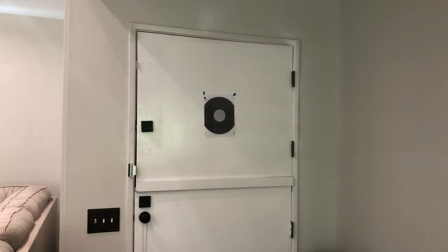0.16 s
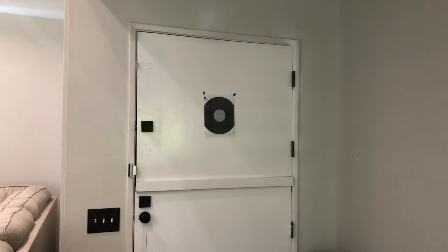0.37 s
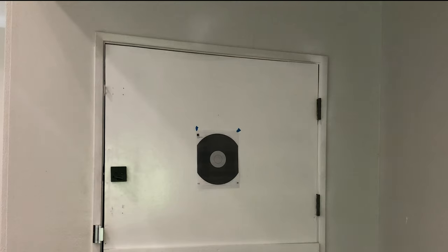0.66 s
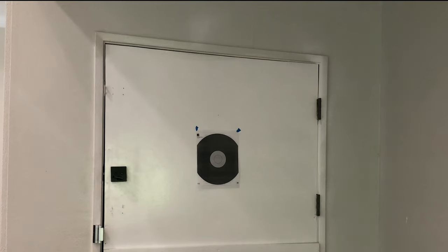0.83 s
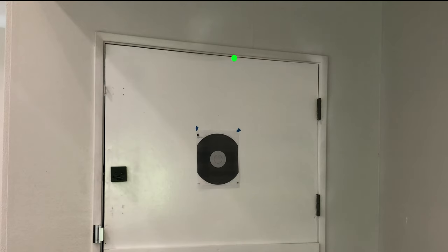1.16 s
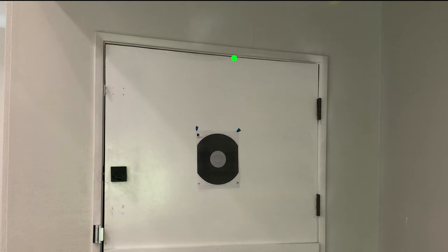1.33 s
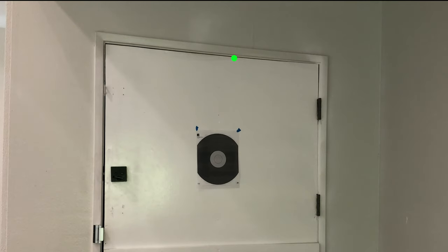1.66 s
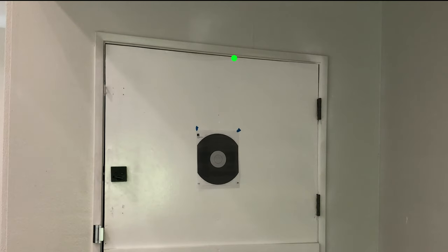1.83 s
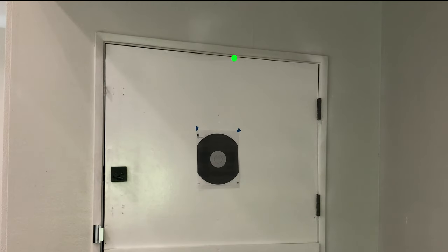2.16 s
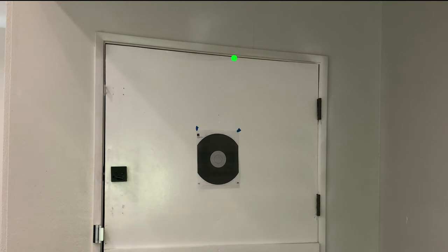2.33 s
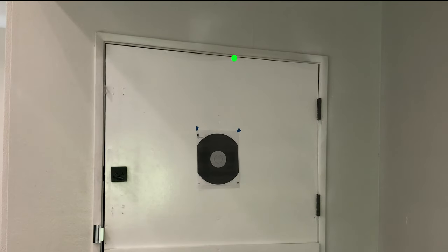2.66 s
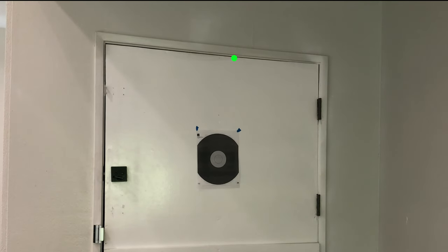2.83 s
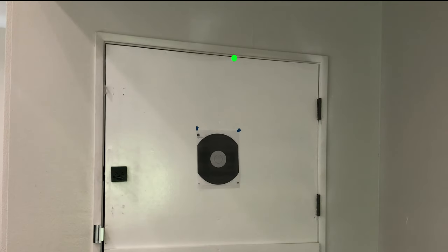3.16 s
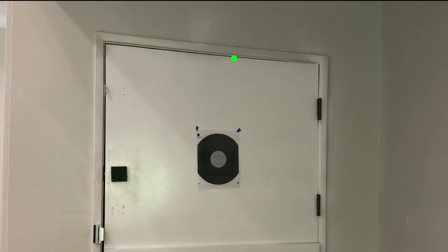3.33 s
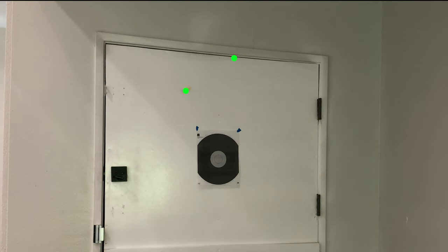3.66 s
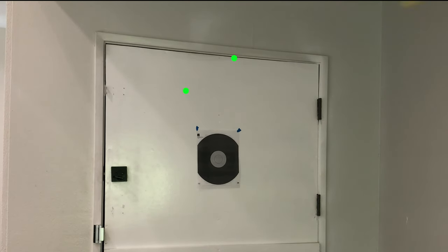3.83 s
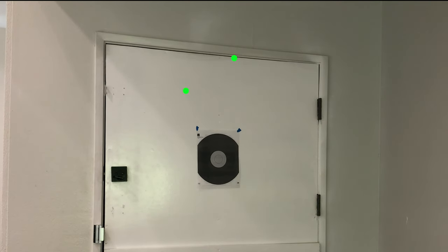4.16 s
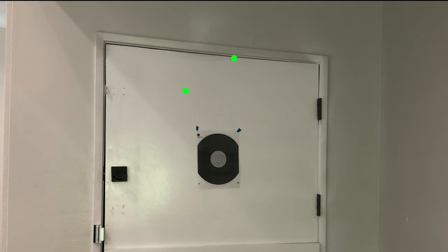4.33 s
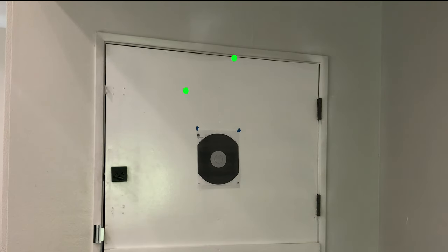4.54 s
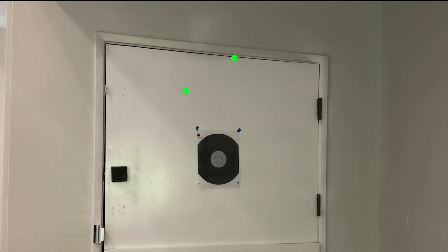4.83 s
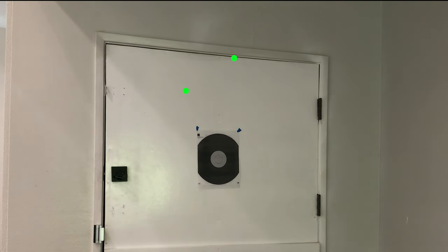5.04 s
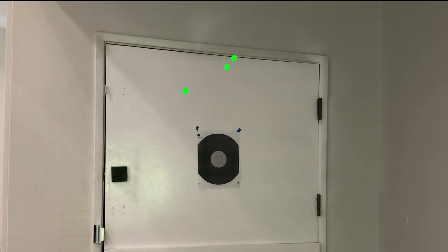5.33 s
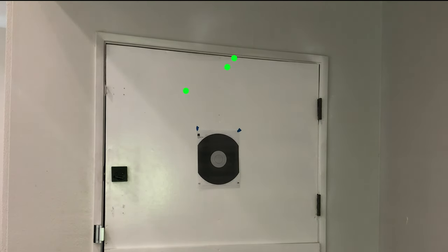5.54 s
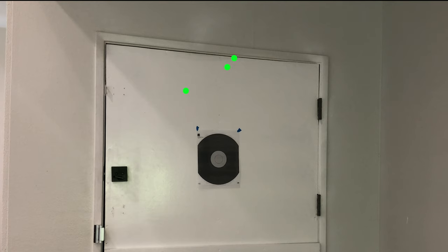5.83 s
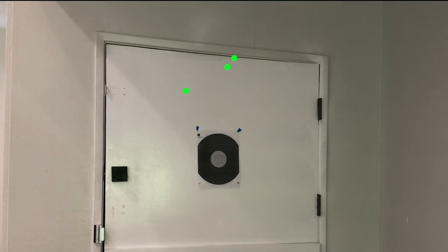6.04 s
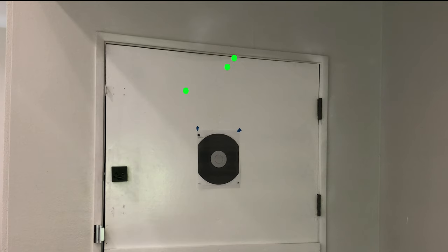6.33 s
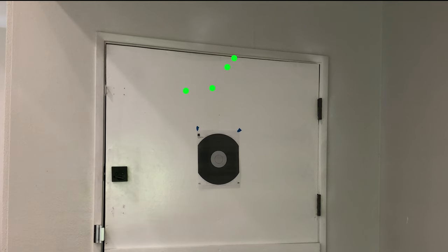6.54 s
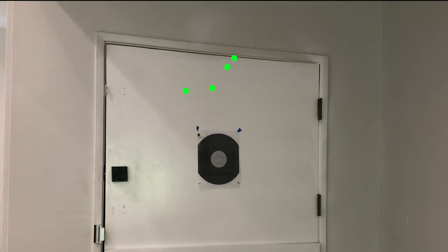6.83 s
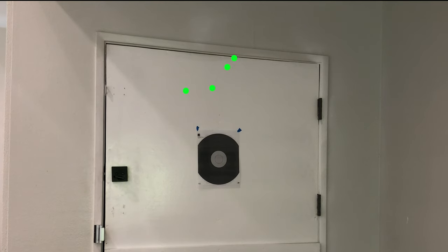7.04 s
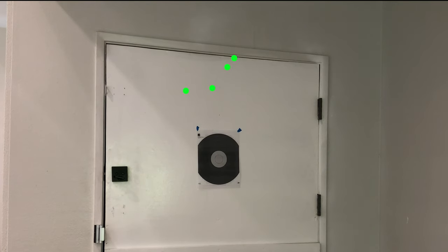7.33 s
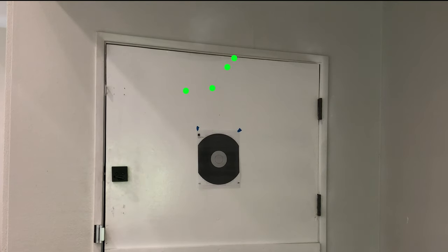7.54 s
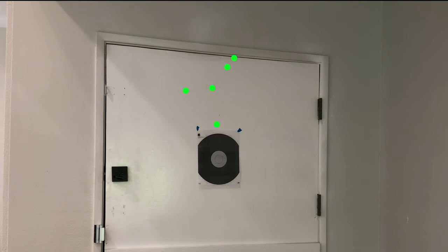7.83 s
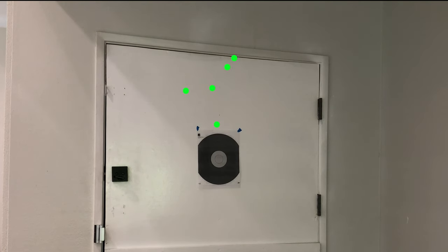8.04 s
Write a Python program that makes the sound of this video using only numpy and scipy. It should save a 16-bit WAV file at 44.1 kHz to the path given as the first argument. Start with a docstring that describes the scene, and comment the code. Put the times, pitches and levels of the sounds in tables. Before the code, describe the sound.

A toy blaster pops, and about 0.3 seconds later its foam ball smacks a panel door close to the microphone. The plastic pump then rattles back and clacks forward, ready for the next shot. Five shots come, the first pump slow, the later ones brisk at roughly 1.3-second spacing. Soft floor bounces follow some hits, and one ball thuds back right beside the microphone. The hard, bare room echoes over a quiet low hum.

```python
"""A pump-action foam ball blaster fires five times across a bare, echoing room at a door close to the microphone.
Each shot is a cavity tone from the barrel, bending upward, with the piston's slam as a burst of dense contacts.
The ball cracks on the door, an impulse dispersed by bending waves over ringing panel modes, and drops to the floor;
one rebounds with hollow thuds. The plastic slide rattles back and forward between shots, over faint rumble and hum."""
import sys
import numpy as np
from scipy import signal
from scipy.fft import rfft, irfft
from scipy.io import wavfile
from scipy.ndimage import uniform_filter1d

SR = 44100
rng = np.random.default_rng(int(sys.argv[2]) if len(sys.argv) > 2 else 0)


def master_out(mix):
    """Clip the mix to full scale and print it as 16-bit PCM to the path in sys.argv[1]."""
    frames = np.transpose(np.atleast_2d(mix))
    ceiling = np.clip(frames, -1, 1)
    pcm = np.round(ceiling * 32767).astype(np.int16)
    wavfile.write(sys.argv[1], SR, pcm)


N = 361179  # samples in the scene
TOP_HZ = 16000
SIZE = 65536  # samples in the buffer of one short sound
T = np.arange(SIZE) / SR
HZ = np.maximum(np.arange(SIZE // 2 + 1) * SR / SIZE, 1)
LEAD_S = 0.05  # room left in a buffer for contacts ahead of the nominal instant

# the shots, levels relative: start_s, barrel_pitch_hz, hoot_db, slam_db
SHOTS = [(1.0013, 605, -2, -5.5), (3.4181, 647, -0.5, -5.5), (4.874, 647, -1, -4.5), (6.1407, 648, -2, -5),
         (7.4145, 657, -2, -4)]
# spectrum of the foam ball's crack: frequency_hz, level_db
CRACK = [(25, -34.5), (60, -14.5), (130, -9), (280, 3), (450, -2), (750, 1.5), (1050, 4), (1600, -3.5),
         (2200, -3), (3200, -6.5), (4500, -9.5), (7000, -10.5), (11000, -16), (16000, -26)]


def undb(db):
    """Amplitude ratio of a level: 20 dB is a factor of ten."""
    return 10 ** (np.asarray(db) / 20)


def along(points, hz=HZ):
    """Interpolate (frequency, value) points on a logarithmic frequency axis."""
    f, value = np.transpose(points)
    return np.interp(np.log(hz), np.log(f), value)


def colour(x, db):
    """Minimum-phase filtering: folding the cepstrum of the wanted gain makes it causal."""
    cepstrum = irfft(np.log(undb(db)))
    cepstrum[1:SIZE // 2] *= 2
    cepstrum[SIZE // 2 + 1:] = 0
    return irfft(rfft(x) * np.exp(rfft(cepstrum)))


def tilt(db_per_octave):
    """Spectral slope pivoting at 2 kHz and level below 250 Hz."""
    return db_per_octave * np.log2(np.maximum(HZ, 250) / 2000)


def add(track, s, x):
    """Superposition: sum the first half of a sound's buffer into the track at time s."""
    start = max(int(s * SR), 0)
    count = min(SIZE // 2, N - start)
    track[start:start + count] += x[:count]


def echoed(x, echoes):
    """Specular reflection: each echo is a delayed, scaled copy, a linear phase in the spectrum."""
    response = 1
    for delay_s, db in echoes:
        response = response + undb(db) * np.exp(-2j * np.pi * HZ * delay_s)
    return irfft(rfft(x) * response)


def rattle(peak, rise, fall, grain_db):
    """Dense, uneven contacts as enveloped noise (times in s); a nearly even spectrum leaves no pitch."""
    grain = uniform_filter1d(rng.standard_normal(SIZE), size=64)
    envelope = np.exp(-np.maximum((peak - T) / rise, (T - peak) / fall))
    contacts = rng.standard_normal(SIZE) * envelope * undb(grain_db * grain / grain.std())
    spectrum = rfft(contacts)
    flattened = irfft(spectrum / np.abs(spectrum) ** .85)
    x = flattened * envelope ** .2
    x = x * np.tanh(20 * envelope)  # fades out where there is hardly any contact
    return x * np.sqrt(np.sum(envelope ** 2) / np.sum(x ** 2))


def pop(hz, swell, order=2, glide=0):
    """Damped cavity resonance: swells for swell s, then fades; its pitch glides in Hz per s through hz at the peak."""
    cycles = T * (hz + glide * (T / 2 - swell))
    envelope = (T / swell * np.exp(1 - T / swell)) ** order
    return np.sin(2 * np.pi * cycles) * envelope


def room(x, wet_db, build):
    """Diffuse reverberation: convolution with noise whose bands build up (build in s) and decay at their own rate."""
    # reverberation time of the room: frequency_hz, t60_s
    room_t60 = [(100, 0.23), (280, 0.66), (700, 0.77), (1100, 0.58), (2000, 0.69), (3200, 0.53),
                (4800, 0.67), (8000, 0.46), (14000, 0.34)]
    noise = rfft(rng.standard_normal(SIZE))
    centres = np.geomspace(50, 16000, 18)
    tail = 0
    for hz, share in zip(centres, np.eye(len(centres))):
        weight = np.interp(np.log(HZ), np.log(centres), share)  # triangular band
        decay = np.exp(-np.log(1000) * T / along(room_t60, hz))
        band = irfft(noise * weight) * decay * (1 - np.exp(-T / build))
        tail = tail + band * np.sqrt(np.mean(weight ** 2) / np.sum(band ** 2))
    return undb(wet_db) * signal.fftconvolve(x, tail)[:N]


def shell_db():
    """Resonance of a hollow shell: Lorentzian peaks and dips, shared by slam and slide."""
    # resonances of the plastic shell: frequency_hz, width_hz, gain_db
    shell = [(792, 90, -3), (900, 64, -6.5), (1900, 120, -1), (2220, 130, 1.5), (3076, 200, 1.5),
             (5260, 200, 2.5), (6850, 240, 1), (8840, 200, -3.5)]
    return sum(db / (1 + ((HZ - hz) / (width / 2)) ** 2) for hz, width, db in shell)


def contact_db(spread_db, count=70):
    """Modal excitation depends on position: each contact point favours other resonances at random."""
    centres = np.geomspace(300, TOP_HZ, count)
    return spread_db * np.interp(HZ, centres, rng.standard_normal(count))


def quiet():
    """Stationary background: shaped noise for house rumble and hiss, even harmonics for mains hum."""
    # spectrum of the still room: frequency_hz, level_db
    still_room = [(25, 2), (60, 1), (110, -1), (200, -0.5), (400, -6), (700, -13.5), (1500, -20.5),
                  (4000, -25.5), (9000, -27.5), (16000, -36.5)]
    hz = np.maximum(np.arange(N // 2 + 1) * SR / N, 1)
    air = irfft(rfft(rng.standard_normal(N)) * undb(along(still_room, hz)), N)
    mains = 2 * np.pi * 60 * np.arange(N) / SR
    hum = undb(-79) * np.sin(6 * mains) + undb(-92.5) * np.sin(2 * mains)  # 360 and 120 Hz
    return undb(-66.5) * air / air.std() + hum


def bounces():
    """Soft impact: the foam ball lands as a short low pulse with a light tick of its skin."""
    # landings on the floor and what stands there: start_s, level_db, pitch_hz, tick_db (relative)
    landings = [(1.773, -45.5, 235, -12), (4.183, -22.5, 290, -6), (4.664, -32.5, 354, -10.5),
                (6.748, -24, 370, 1.5), (7.202, -27, 2110, -10), (7.21, -30.5, 520, -12.5)]
    out = np.zeros(N)
    for s, db, hz, tick_db in landings:
        skin = rattle(0.0011, 0.0005, fall=0.0055, grain_db=-7.5)
        tick = undb(tick_db + 6) * colour(skin, along(CRACK) + tilt(0.45))
        add(out, s, undb(db) * (pop(hz, swell=0.54 / hz) + tick))
    return out + room(out, wet_db=1.0, build=0.0034)


def rebound(count=4):
    """Repeated impact: hollow thuds close to the microphone, each chattering on softer and lower."""
    # thuds of one rebounding ball: start_s, level_db, pitch_hz
    thuds = [(3.7189, -11, 636), (3.7270, -2.5, 408), (3.7461, -4, 369), (3.7594, -6, 590)]
    gap_s, step_db, pitch_ratio = 0.00654, -6.5, 0.91  # per repeat
    out = np.zeros(N)
    for s, db, hz in thuds:
        for k in range(count):
            thud = pop(hz * pitch_ratio ** k, swell=0.0016)
            add(out, s + k * gap_s, undb(db + k * step_db) * thud)
    return out + room(out, wet_db=-6.0, build=0.0025)


def strokes():
    # slide pulled back, levels relative: rear_stop_s, level_db, travel_s (from the catch), catch_db,
    # knock_db (against the stop's clack)
    pulls = [(2.352, -4, 0.08, -7.5, -45), (4.079, -.5, .037, -4, -25), (5.451, -1, 0.043, -5.5, -22),
             (6.716, -1, .038, -4, -24), (8.025, -2, .046, -6, -35)]
    # slide pushed forward, levels relative: latch_s, level_db, travel_s
    pushes = [(2.668, -1.5, .041), (4.373, -2.5, .046), (5.713, -2.5, .044), (6.977, -3, 0.042)]
    # hollow knocks of the shell: s ahead of the clack, dB against its setting, Hz
    catch_knock, start_knock, latch_knock = (.015, -25.5, 667), (0.0063, -25, 830), (0.00616, -33.5, 338)
    slack_s, slack_db = .028, -10.5  # the hand takes up the slack: time ahead of the catch, dB against it
    for s, db, travel, catch_db, knock_db in pulls:
        yield s - travel - slack_s, catch_db + slack_db, .008, .5, None
        yield s - travel, catch_db, .0043, .1, catch_knock
        # the rattle swells over a quarter of the travel into the rear stop
        yield s, db, 0.25 * travel, .45, (0.00589, knock_db, 1050)
    for s, db, travel in pushes:
        yield s - travel, db - 3, .0072, .7, start_knock
        yield s, db, .007, -.4, latch_knock


def slide():
    """Contact noise in a resonant shell: the slide rattles to its stops and the hands click on the shell."""
    # spectrum of the slide: frequency_hz, level_db
    plastic = [(50, -28), (150, -19.5), (310, -2), (480, -3.5), (750, 3.5), (1000, 0.5), (1500, -2),
               (2400, -2), (4000, -5.5), (6700, -5.5), (10000, -7.5), (16000, -17)]
    # light clicks of trigger and grip: start_s, level_db (relative), brightness_db_per_octave
    light_clicks = [(.298, -31, 0), (1.520, -15, -1.5), (2.035, -30.5, -6), (2.098, -28.5, -4),
                    (2.139, -24, -1), (2.254, -28, 1), (3.352, -36, -3), (7.655, -17.5, 0)]
    # faint taps on the shell while aiming: start_s, level_db, pitch_hz (before scatter)
    taps = [(.298, -57.5, 940), (.384, -54, 1115)]
    out = np.zeros(N)
    body = along(plastic) + shell_db()
    clicks = [(s, db, 0.0032, bright, None) for s, db, bright in light_clicks]  # rise in s
    knocks = list(taps)
    for s, db, rise, bright, knock in list(strokes()) + clicks:
        clack = rattle(LEAD_S, rise, fall=0.0053, grain_db=3.0)
        spot = contact_db(spread_db=2.2)
        add(out, s - LEAD_S, undb(db - 19.0) * colour(clack, body + spot + tilt(bright)))
        if knock:
            ahead, knock_db, hz = knock
            knocks.append((s - ahead, db + knock_db, hz))
    for s, db, hz in knocks:
        pitch = hz * (1 + 0.033 * rng.standard_normal())
        add(out, s, undb(db) * pop(pitch, swell=1.3 / hz))
    return out + room(out, wet_db=4.5, build=0.0013)


def door():
    """Dispersion of bending waves: the crack's highs arrive first, its lows later, over decaying panel modes."""
    # the ball strikes the door, levels relative: start_s, level_db, brightness_db_per_octave, ring_db
    strikes = [(1.2811, 1, 0.5, -4), (3.717, -0.5, 1.5, 0.5), (5.169, 1, 0.3, -5), (6.4323, 0.5, 1, -5.5),
               (7.7074, -1, 0.97, -3)]
    # reflections off the frame, side wall and ceiling: delay_s, level_db
    door_echoes = [(.0012, -6), (.003, -2), (.0045, -8.5), (.0075, -13), (.0095, -17), (0.0121, -7.5)]
    # modes of the door panel: frequency_hz (before scatter), level_db (relative), t60_s
    panel = [(59.6, -32.5, 0.26), (71.3, -44, 0.76), (86, -36, 0.42), (98, -39.5, 0.66), (235, -33, 0.16),
             (263, -15, 0.075), (282, -32.5, 0.24), (1012, -34.5, 0.61), (1120, -37, 0.24),
             (1190, -38.5, .4), (1490, -33, 0.34), (1890, -53.5, 0.59), (1980, -41.5, 0.52),
             (2340, -43.5, 0.39)]
    cracks, out = np.zeros(N), np.zeros(N)
    low_delay_s, corner_hz = .021, 350
    delay = low_delay_s / (1 + (HZ / corner_hz) ** 2.506)
    # phase is the running sum of group delay over frequency
    bending = np.exp(-2j * np.pi * np.cumsum(delay) * SR / SIZE)
    impulse = (T == 0).astype(float)
    for s, db, bright, ring_db in strikes:
        blow = colour(impulse, along(CRACK) + tilt(bright))
        crack = undb(db + 17.0) * irfft(rfft(blow) * bending)
        add(cracks, s, crack)
        add(out, s, echoed(crack, door_echoes))
        for hz, mode_db, t60 in panel:
            phase = 2 * np.pi * hz * (1 + 0.0072 * rng.standard_normal()) * T
            decay = np.exp(-np.log(1000) * T / t60)
            add(out, s + .012, undb(ring_db + mode_db) * np.sin(phase) * decay)
    return out + room(cracks, wet_db=2.5, build=0.00048)


def piston():
    """Impact excitation: the catch lets go, then the piston slams into the end of its tube."""
    # spectrum of the slam: frequency_hz, level_db
    slam_spectrum = [(50, -33.5), (100, -15), (250, 5), (420, -1.5), (750, 15), (1080, 8.5), (1400, 2),
                     (1900, 1.5), (2500, -4), (3600, -4.5), (5200, -3.5), (7000, -8.5), (11000, -9),
                     (16000, -16.5)]
    out = np.zeros(N)
    body = along(slam_spectrum) + shell_db() + contact_db(spread_db=1.5)
    for s, _, _, db in SHOTS:
        release = undb(-14) * rattle(peak=LEAD_S + 0.0031, rise=0.0039, fall=0.0069, grain_db=-2.5)
        slam = rattle(peak=LEAD_S + 0.015, rise=0.0051, fall=0.007, grain_db=4.0)
        add(out, s - LEAD_S, undb(db - 3.0) * colour(release + slam, body))
    return out + room(out, wet_db=1.5, build=0.0018)


def afterring():
    """Room modes store energy: a few resonances swell and fade after each shot."""
    # lingering room resonances: frequency_hz, level_db (against the shot's hoot setting), peak_s
    resonances = [(282, -37, .095), (600, -30, 0.066), (740, -37.5, 0.3)]
    out = np.zeros(N)
    for s, _, db, _ in SHOTS:
        for hz, ring_db, peak in resonances:
            add(out, s, undb(db + ring_db) * pop(hz, swell=peak, order=12))
    return out


def flutter(count=14):
    """Flutter echo between facing walls: slightly uneven (delay s, dB) that gather to a peak, then fade."""
    spacing_s, peak_s, peak_db = .0137, .07, -11
    rise_db_per_s, fall_db_per_s = 220.5, 230
    delay = spacing_s * np.arange(1, count + 1) + 0.00026 * rng.standard_normal(count)
    late = delay - peak_s
    loss_db = np.maximum(-late * rise_db_per_s, late * fall_db_per_s)
    return zip(delay, peak_db - loss_db)


def barrel():
    """Air-column resonance: air drives the ball out with a rising hoot and low puff, thrown between the walls."""
    source, out = np.zeros(N), np.zeros(N)
    walls = list(flutter())
    for s, hz, db, _ in SHOTS:
        # the pitch bends upward as the ball runs down the barrel
        tone = pop(hz, swell=0.0055, order=3, glide=13000)
        puff = undb(-15) * pop(hz=202, swell=0.0046, order=5)
        hoot = undb(db - 8.5) * (tone + puff)
        add(source, s, hoot)
        add(out, s, echoed(hoot, walls))
    return out + room(source, wet_db=0.5, build=.01)


def scene():
    """Superposition of the still room, the ball's impacts, the near door and the far blaster."""
    ball = bounces() + rebound() + door()
    blaster = slide() + piston() + afterring() + barrel()
    return (quiet() + ball + blaster)[None]


def record(dry):
    """Band limiting and saturation: drop the deepest bass, round the loudest peaks, cut the top."""
    ceiling = .7
    bass_cut = signal.butter(5, 49, "highpass", fs=SR, output="sos")
    top_cut = signal.ellip(10, .2, 80, TOP_HZ, fs=SR, output="sos")
    lean = signal.sosfilt(bass_cut, dry)
    rounded = ceiling * np.tanh(lean / ceiling)
    return signal.sosfilt(top_cut, rounded)


dry = scene()
out = record(dry)
master_out(out)
```